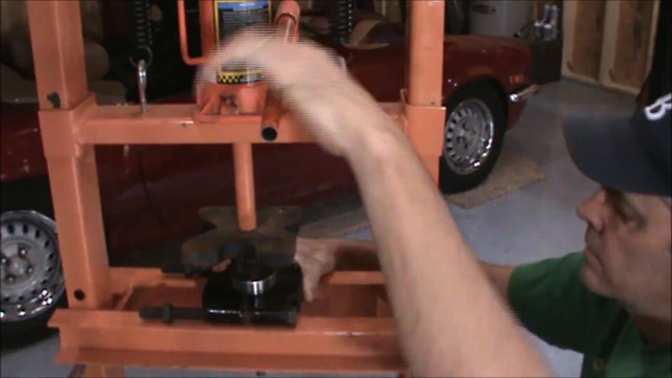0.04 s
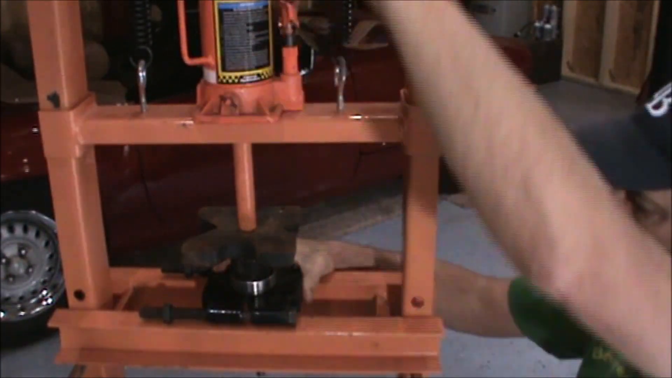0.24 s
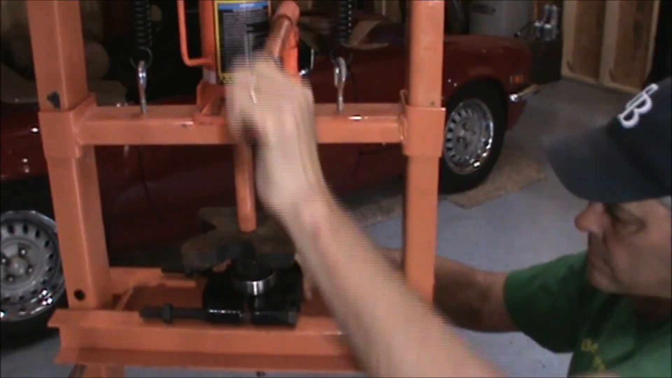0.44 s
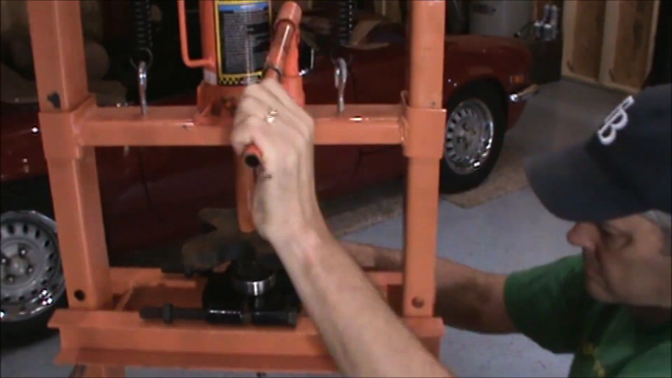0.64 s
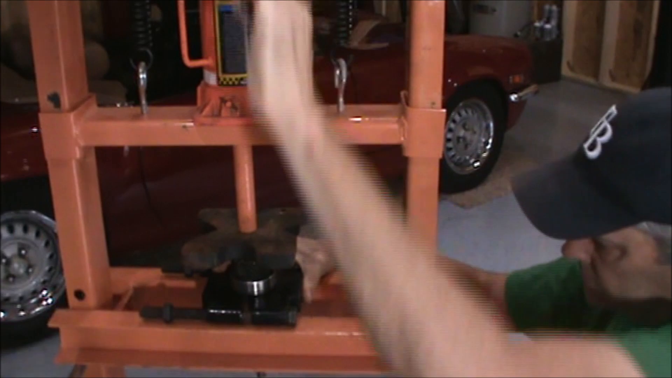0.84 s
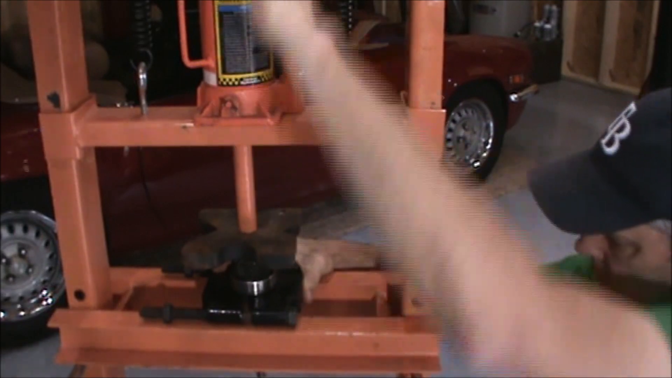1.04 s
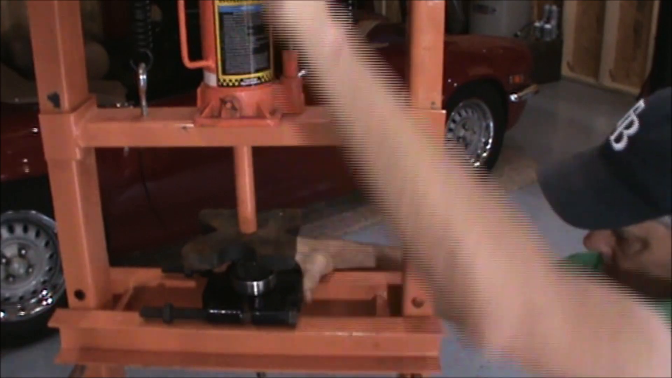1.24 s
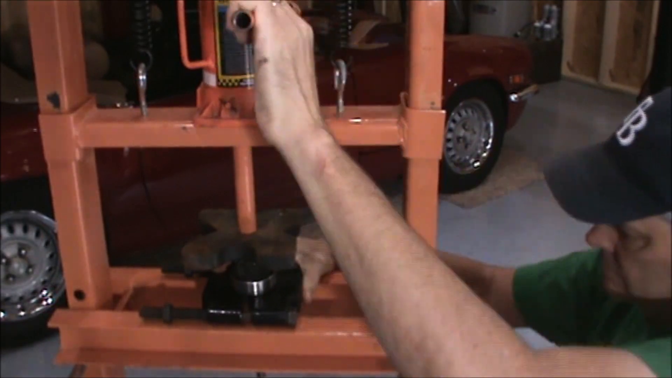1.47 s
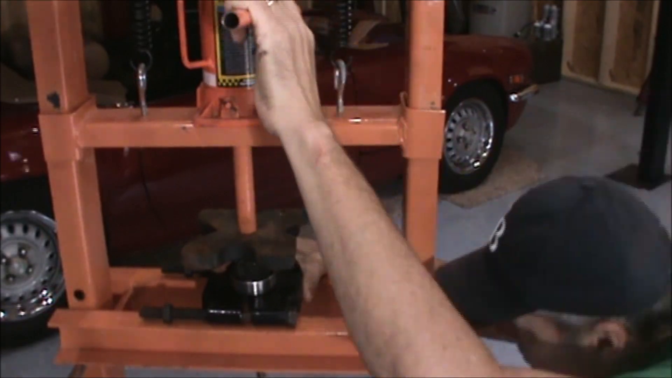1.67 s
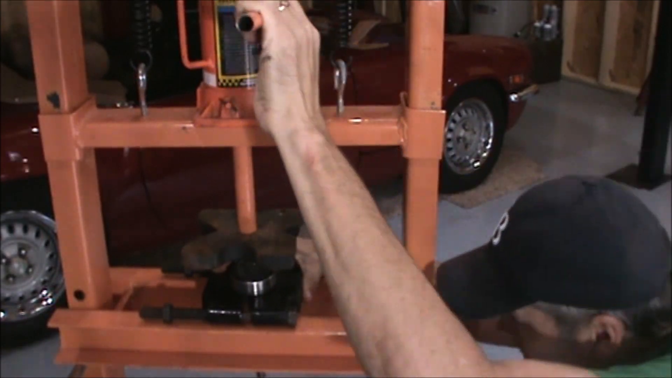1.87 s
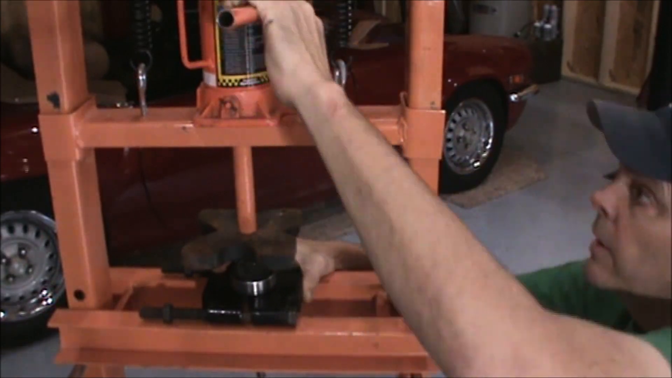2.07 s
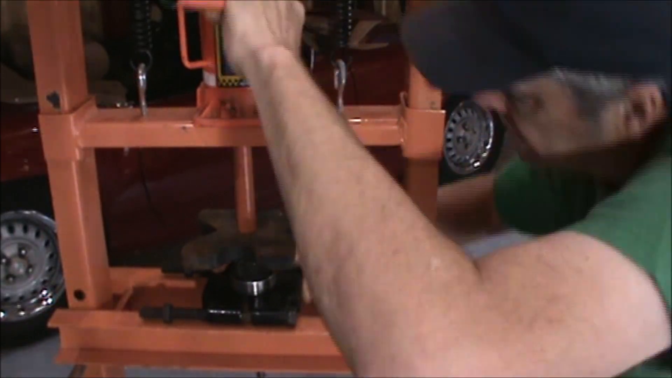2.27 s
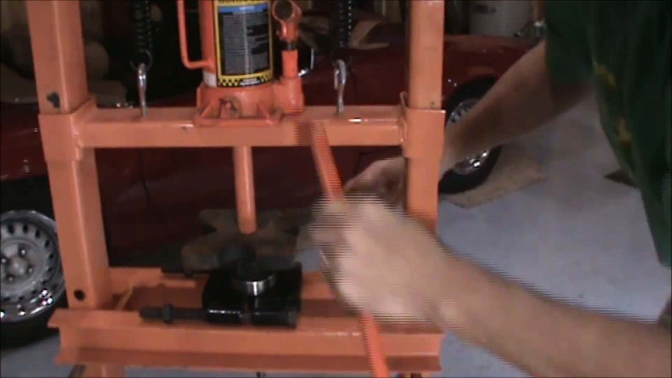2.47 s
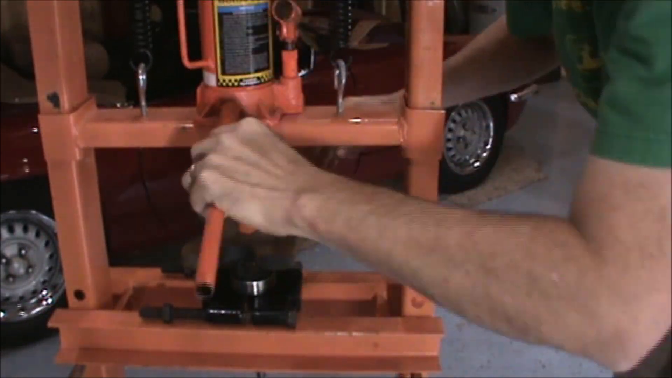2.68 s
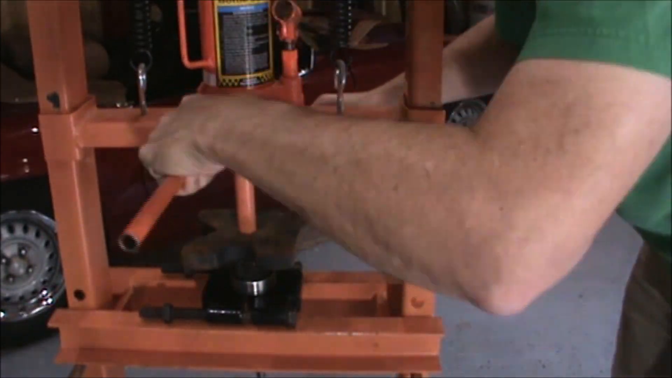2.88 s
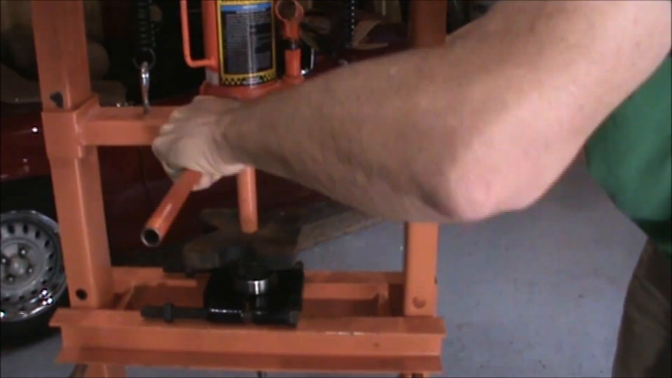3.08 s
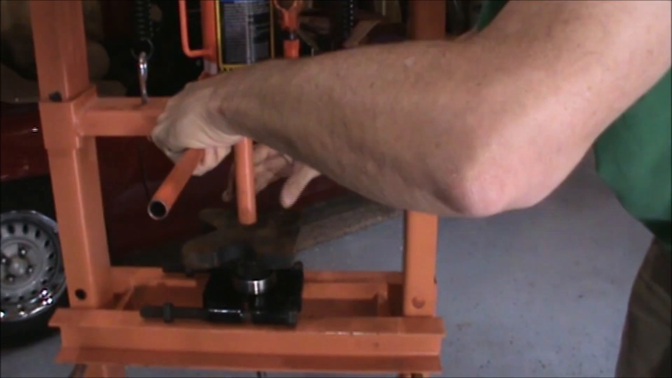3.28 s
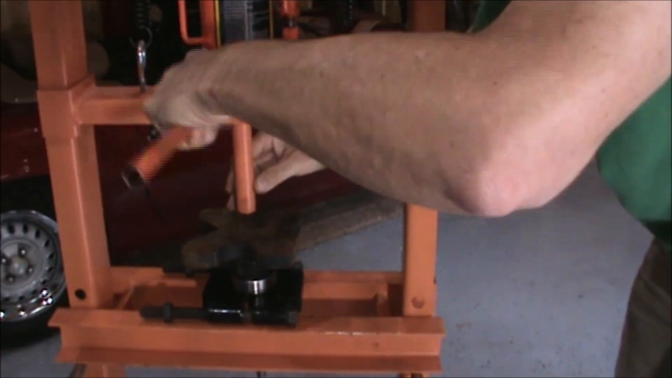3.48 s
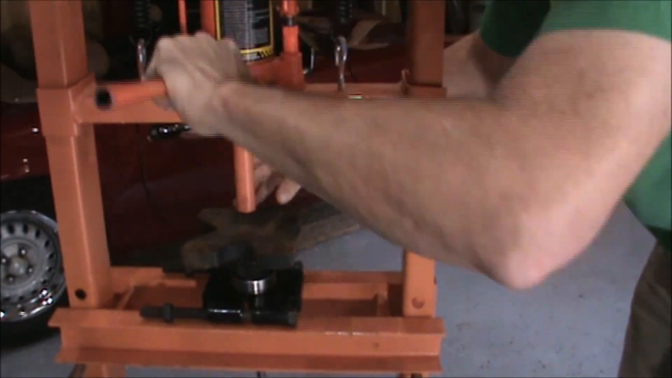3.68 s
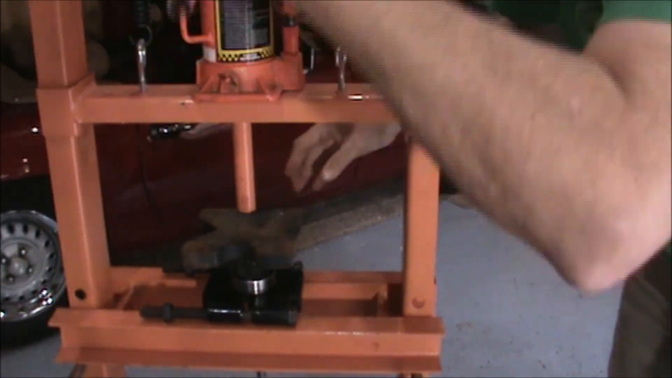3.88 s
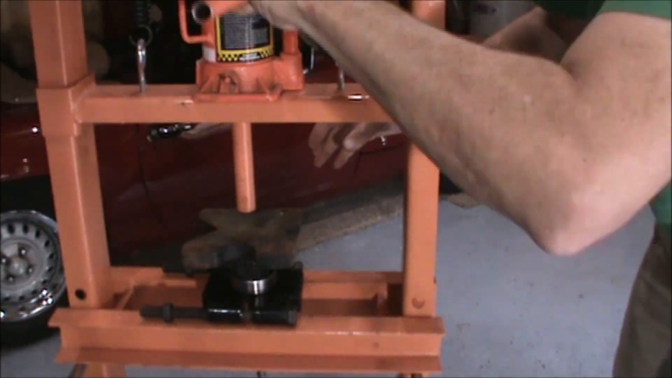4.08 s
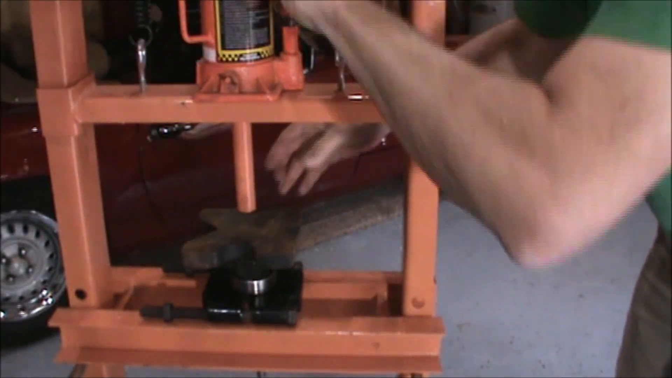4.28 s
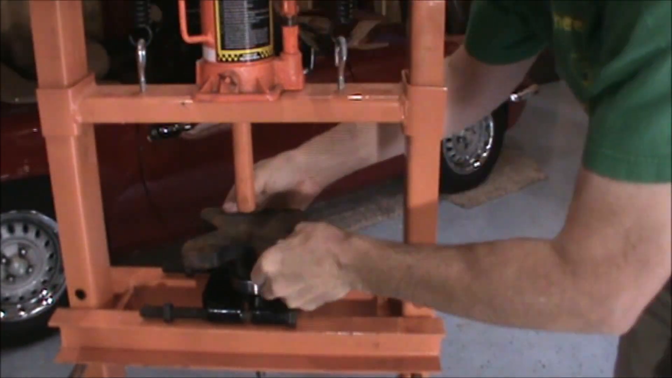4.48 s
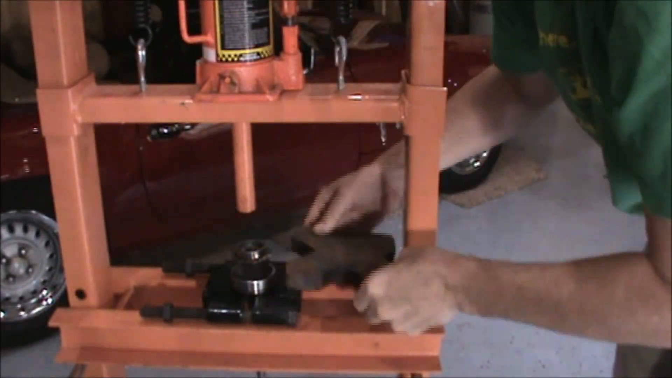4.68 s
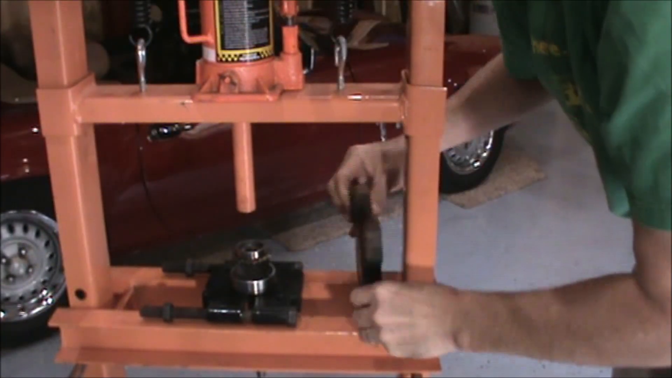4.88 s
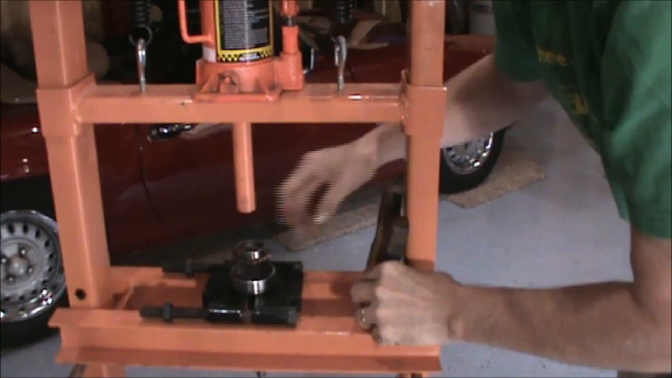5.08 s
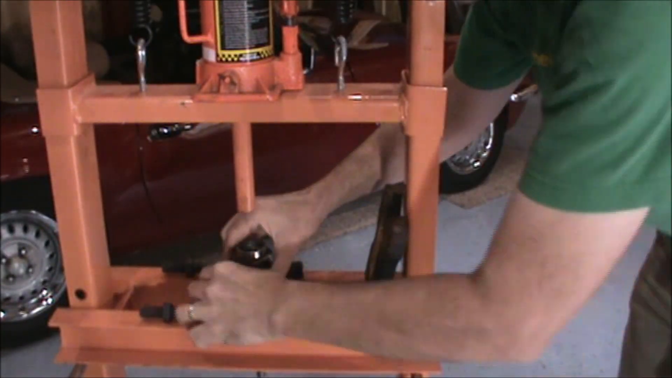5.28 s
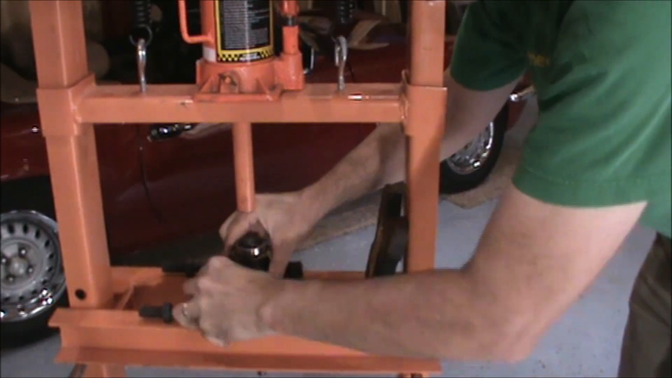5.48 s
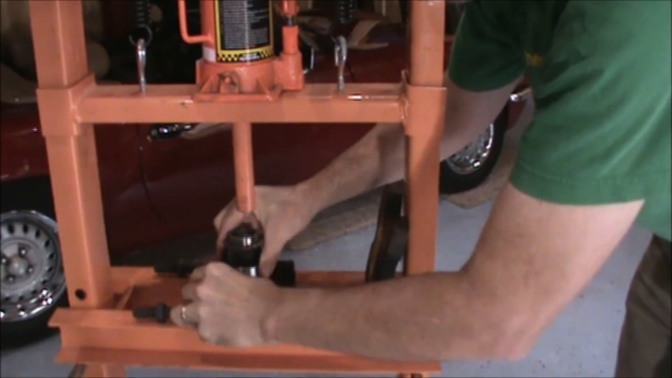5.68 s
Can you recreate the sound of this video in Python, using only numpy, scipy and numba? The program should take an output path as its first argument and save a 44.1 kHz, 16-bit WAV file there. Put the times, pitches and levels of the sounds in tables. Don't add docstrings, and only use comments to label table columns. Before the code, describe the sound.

Close in a small garage with faint hum, a jack lever is pumped five times, each stroke a loud clattering double bang with loose pin rattle. Springs ring on briefly. A pipe handle groans and scrapes free, knocks about, oil hisses faintly, the valve thread squeaks twice, then light ticks and a loud iron clunk as parts are set down.

```python
import sys
import numpy as np
from scipy import signal
from scipy.fft import rfft, irfft
from scipy.io import wavfile
from scipy.ndimage import uniform_filter1d
from numba import njit

SR = 44100
rng = np.random.default_rng(int(sys.argv[2]) if len(sys.argv) > 2 else 0)


def invert_db(level):
    return 10 ** (np.asarray(level, dtype=float) / 20)


def inscribe(sig):
    pcm = np.round(np.clip(np.atleast_2d(sig).T, -1, 1) * 32767)
    wavfile.write(sys.argv[1], SR, pcm.astype(np.int16))


N = 252674
T = np.arange(N) / SR


def noise():
    return rng.standard_normal(N)


def unit(x):
    return x / np.sqrt(np.mean(x ** 2))


def band(x, lo_hz, hi_hz, order=2):
    return signal.sosfilt(signal.butter(order, [lo_hz, hi_hz], "bandpass", fs=SR, output="sos"), x)


def walk(rate_hz):
    k = int(SR / rate_hz)
    return uniform_filter1d(np.repeat(rng.standard_normal(N // k + 1), k), k)[:N]


def curves(table):
    s, *columns = np.transpose(table)
    gate = uniform_filter1d(1. * ((T > s[0]) & (T < s[-1])), size=200)
    return [np.interp(T, s, c) for c in columns] + [gate]


def effort(start_s, level_db, rise_s, hold_s, fall_s):
    times = np.cumsum([start_s, rise_s, hold_s, fall_s])
    levels = level_db - 26.5 * np.array([1, 0, 0, 1])
    return curves(np.transpose([times, levels]))


def heard(level):
    return invert_db(level[0]) * level[1]


def resonances(x, peaks):
    total = 0
    for hz, width_hz, db in peaks:
        total = total + invert_db(db) * signal.lfilter(*signal.iirpeak(hz, hz / width_hz, SR), x) / np.sqrt(width_hz)
    return unit(total)


def squeak(hz, db, gate, overtones, wobble, flutter_db):
    phase = 2 * np.pi * np.cumsum(hz * (1 + wobble * walk(250))) / SR
    tone = 0
    for k, overtone_db in enumerate(overtones):
        tone = tone + invert_db(overtone_db + flutter_db * walk(119.95)) * np.sin((k + 1) * phase)
    return gate * invert_db(db) * tone


@njit
def ring(force, which, gain, pole):
    out = np.zeros(len(force))
    for m in range(pole.shape[1]):
        z = 0j
        for i in range(len(force)):
            z = z * pole[which[i], m] + force[i] * gain[which[i], m] + 1e-18
            out[i] += z.imag
    return out


def knocks(events, modes, ring_db, bare_db, strike_db, grit_db=2.5, clump_db=2.5, scatter_db=3.0,
           treble_hz=7800, tick=0.68, detune=.001):
    events = sorted(events)
    envelope, which, blow = np.zeros((3, N)), np.zeros(N, np.int64), np.zeros(N)
    t = T[:SR // 4]
    linger = np.array([[1.6], [1], [1]])
    for k, (s, db, high_db, low_db, t60_s, held_s) in enumerate(events):
        i = int(s * SR)
        chatter = np.exp(-np.log(1000) * np.maximum(t - held_s, 0) / (t60_s * linger))
        fade = chatter + tick * np.exp(-t / 0.00094)
        new = (invert_db(db + np.array([[low_db], [0], [high_db]])) * fade)[:, :N - i]
        envelope[:, i:i + len(t)] = np.maximum(envelope[:, i:i + len(t)], new)
        blow[i] = invert_db(db + strike_db)
        which[i:] = k
    grit = unit(noise() * invert_db(grit_db * noise() + clump_db * walk(400)))
    grit[blow > 0] = 1.56
    bare = 0
    for e, (lo, hi) in zip(envelope, [(860, 1700), (2350, 8290), (treble_hz, 20200)]):
        bare = bare + band(e * grit, lo, hi, order=3) * np.sqrt(SR / 2 / (hi - lo))
    hz, db, t60_s = np.transpose(modes)
    high_db, low_db = np.array(events)[:, 2:4].T
    db = db + np.outer(np.minimum(low_db + 10, 3), hz < 1900) + np.outer(np.minimum(high_db, 0), hz > 9200)
    shape = (len(events), len(hz))
    gain = invert_db(db + scatter_db * rng.standard_normal(shape)) * (-1.) ** np.arange(len(hz))
    loose_hz = hz * (1 + detune * rng.standard_normal(shape))
    pole = np.exp(2j * np.pi * loose_hz / SR - np.log(1000) / (t60_s * SR))
    return invert_db(bare_db) * bare + ring(invert_db(ring_db) * bare + blow, which, gain, pole)


# chatter_t60_s, chatter_held_s
CHATTER_OF_KIND = dict(pump=(0.13, 0.006), link=(0.095, 0.0014), spring=(.07, 0.03), handle=(0.085, 0.0036),
                   tick=(0.023, 0.00099), glint=(0.046, 0.0022), shim=(0.078, 0.0055), part=(0.094, 0.0033),
                   bearing=(0.036, 0.0028))


def kind(rows, name, *shared_db):
    return [(*row, *shared_db, *CHATTER_OF_KIND[name]) for row in rows]


# pitch_hz, level_db (against the air)
LAMP_LINES = [(479, -3.5), (963, -8.5), (1349, -7.5), (1662, -13), (4930, -11), (4330, -9.5)]


def lamp_hum():
    hum = 0
    for hz, db in LAMP_LINES:
        hum = hum + invert_db(db + 3.5 + walk(14)) * np.sin(2 * np.pi * hz * T + .5 * walk(8.9))
    return hum


# pitch_hz, level_db (per Hz)
HUSH_COLOUR = [(15, -62), (25, -53), (142, -16.5), (330, -5.5), (368, -6.5), (483, -2.5), (584, -6.5),
               (952, -4.5), (1780, -11.5), (4240, -14.5), (4730, -14), (5130, -16.5), (5720, -18),
               (15200, -25.5), (16500, -51)]


def air(level_db):
    hz, colour_db = np.transpose(HUSH_COLOUR)
    f = np.fft.rfftfreq(N, 1 / SR)
    shape = invert_db(np.interp(np.log(f + 1), np.log(hz), colour_db))
    mid, side = (irfft(rfft(noise()) * shape, N) for _ in range(2))
    side = invert_db(-19) * side + invert_db(-6.0) * band(side, 1230, 21000)
    both = np.array([mid + side, mid - side]) / np.std(band(mid, 150, 785))
    treble = np.array([band(c, 1140, 22000) for c in both])
    treble_gain = invert_db(3.5 + 0.91 * walk(5.8)) - 1
    return invert_db(level_db - 3.5 + 1.06 * walk(5.19)) * (both + treble_gain * treble + lamp_hum())


def ducked(metal):
    start_db, lowest_db, loudest_db, slope, climb_db_per_s = -54, -56, -22.5, 4.4, 3.5
    loud_db = 10 * np.log10(uniform_filter1d(metal[0] ** 2, size=1300) + 1e-9)
    ceiling = lowest_db + slope * np.maximum(loudest_db - loud_db, 0)
    ceiling[0] = start_db
    climb = climb_db_per_s * T
    return uniform_filter1d(climb + np.minimum.accumulate(ceiling - climb), size=900)


def garage(x):
    t60_s, tail_db = 0.17, -9
    t = T[:SR // 2]
    fade = np.exp(-np.log(1000) * t / t60_s) * (1 - np.exp(-t / 0.0032))
    tail = signal.lfilter([1], [1, -.35], rng.standard_normal((3, len(t))) * fade)
    tail = np.array([0.7 * tail[0] + tail[1], 0.72 * tail[0] + tail[2]])
    tail *= invert_db(tail_db) / np.sqrt(np.sum(tail ** 2) / 2)
    return x * invert_db(np.array([[.4], [-.4]])) + signal.fftconvolve(x[None], tail)[:, :N]


# start_s, peak_db, treble_db, lows_db (both against the peak)
BEARING_KNOCKS = [
    (3.158, -21, -1.5, -19),
    (4.5535, -27, -12, -15),
    (5.4015, -35, -5, -19),
    (5.4055, -26, -5, -19),
    (5.409, -15.5, -4, -21),
    (5.412, -21, -6, -24.5),
    (5.633, -47, -14, -38),
    (5.65, -40.5, -14, -38),
    (5.698, -47, -14, -38),
]
# pitch_hz, level_db, t60_s
RACE_MODES = [(1316, -8, 0.033), (4610, -13, 0.025), (4200, -17, 0.032), (5846, -17, .04),
              (4818, -20, 0.18), (6780, -11, 0.02), (8650, 3, 0.025), (8580, -10, 0.07), (9948, -22, 0.05),
              (11530, -26, 0.09)]


def bearing():
    return knocks(kind(BEARING_KNOCKS, "bearing"), RACE_MODES, ring_db=-57.0, bare_db=-14.5, strike_db=-1.0,
                  scatter_db=-0.1, tick=.3)


# start_s, peak_db, treble_db, lows_db (both against the peak)
SHIM_KNOCKS = [
    (4.785, -17.5, -19, -10.5),
    (4.9801, -32, -9, 5),
    (5.522, -32, -16, -13),
]
# pitch_hz, level_db, t60_s
SHIM_MODES = [(1332, -12, 0.058), (2030, 3, .035), (2336, -4, 0.037), (2750, -1, 0.035), (3230, -2, 0.14),
              (4040, -11, .04), (4430, 0.5, 0.035), (4900, -10, .06), (5640, -4, 0.04), (6360, -15, .03),
              (7350, -15, .03)]


def shims():
    return knocks(kind(SHIM_KNOCKS, "shim"), SHIM_MODES, ring_db=-50.0, bare_db=-15.0, strike_db=-15.0,
                  scatter_db=4.5)


# start_s, peak_db, treble_db, lows_db (both against the peak)
PART_KNOCKS = [
    (5.0335, -5, -6, -19),
]
# pitch_hz, level_db, t60_s
IRON_MODES = [(1340, -11, 0.046), (2060, -3, 0.03), (2340, -20, 0.12), (3120, -4, 0.057), (3270, 1.5, 0.11),
              (3355, -2.5, 0.13), (3480, -5, 0.067), (3994, -12, 0.16), (4600, -9, 0.15),
              (4830, -3.5, 0.33), (5180, -4, 0.05), (5534, -4, .09), (5857, -16, 0.37), (6700, -26, .25),
              (8484, -18, .1), (10400, -16, .06)]


def parts():
    return knocks(kind(PART_KNOCKS, "part"), IRON_MODES, ring_db=-54.5, bare_db=-14.5, strike_db=-18.0,
                  scatter_db=0.8, tick=.3)


# pitch_hz, width_hz, level_db
OIL_PEAKS = [(10300, 250, -2), (10480, 200, -3), (10900, 150, -1), (11700, 200, 3), (12900, 250, 3),
             (13700, 200, 3)]


def oil():
    jets = invert_db(5 * walk(18)) * resonances(noise(), OIL_PEAKS) + 0.44 * unit(band(noise(), 4200, 20000))
    hiss = invert_db(3.7 * walk(34)) * jets
    whistle = resonances(noise(), [(6630, 300, 0)])
    return (heard(effort(3.16, -52.5, .01, .31, .02)) * hiss
            + heard(effort(3.36, -46, .09, .035, .012)) * whistle)


# time_s, level_db
RUB_LEVEL = [(3.488, -54.5), (3.497, -38), (3.52, -38.5), (3.565, -47), (3.574, -30), (3.59, -31.5),
             (3.605, -46), (3.63, -68)]
# pitch_hz, width_hz, level_db
RUB_PEAKS = [(2730, 140, 9), (3270, 270, 8), (3850, 720, 12.5), (5470, 400, 4), (7400, 1000, 7),
             (10000, 1000, 0), (14500, 2500, -24)]
# pitch_hz, width_hz, level_db
BODY_PEAKS = [(4160, 210, 0), (5050, 300, 1), (5600, 350, -6)]


def thread_rub():
    rub = heard(curves(RUB_LEVEL)) * invert_db(3.5 * walk(250)) * resonances(noise(), RUB_PEAKS)
    body = invert_db(3. * walk(90)) * resonances(noise(), BODY_PEAKS)
    return rub + heard(effort(3.6, -46, .02, .06, .16)) * body


# time_s, level_db
FIRST_SQUEAK = [(3.488, -46), (3.495, -19), (3.506, -19), (3.511, -27), (3.519, -21), (3.527, -29),
                (3.536, -48), (3.548, -35), (3.558, -52)]
# time_s, pitch_hz, level_db
SECOND_SQUEAK = [(3.505, 3630, -50), (3.511, 3630, -23), (3.53, 3640, -22), (3.559, 3690, -24),
                 (3.566, 3800, -23), (3.572, 3760, -34), (3.588, 3700, -50)]
FIRST_OVERTONES = [-0.5, -8.5, -20, -19, -23, -22]
SECOND_OVERTONES = [0.5, -6, -7.5, -6]


def valve_squeaks():
    first_hz = 2390
    first = squeak(first_hz, *curves(FIRST_SQUEAK), FIRST_OVERTONES, 0.009, 1.8)
    octave = squeak(first_hz, *effort(3.5, -31, .008, .022, .07), [-30., 0], 0.0054, 2.5)
    sum_tone = squeak(8440, *effort(3.508, -42, .004, .015, .02), [0], .003, 3.3)
    second = squeak(*curves(SECOND_SQUEAK), SECOND_OVERTONES, 0.005, 2.0)
    return first + octave + sum_tone + second


# time_s, pitch_hz, level_db
GROAN_GLIDE = [(2.132, 730, -66), (2.138, 716.5, -36), (2.15, 750, -30), (2.161, 885, -33),
               (2.174, 936, -31), (2.182, 970, -44), (2.195, 905, -54)]
GROAN_OVERTONES = [-0.5, -18, -1.5, -24]
# pitch_hz, width_hz, level_db
FREEING_PEAKS = [(1780, 420, -3), (2240, 88, -3), (2520, 200, 9.5), (2740, 150, -30), (5900, 500, -3.5),
                 (10100, 600, -25)]
SLIDING_PEAKS = [(2370, 170, -10), (3140, 330, 2.5), (4020, 95, -9), (7240, 1600, -2.5), (10520, 220, -1),
                 (13600, 1500, -11)]


def drag():
    grains = noise() * invert_db(3.0 * walk(500) + 1.8 * walk(60))
    low = resonances(grains, FREEING_PEAKS) + 0.089 * unit(band(grains, 650, 19000))
    high = resonances(grains, SLIDING_PEAKS) + 0.11 * unit(band(grains, 2700, 15000))
    brush = unit(band(grains, 3500, 16000))
    scrape = heard(effort(2.126, -27, .024, .03, .035)) * low
    scrape += heard(effort(2.12, -35, .1, .045, .09)) * high
    scrape += heard(effort(2.468, -41, .015, .02, .05)) * brush
    return scrape + squeak(*curves(GROAN_GLIDE), GROAN_OVERTONES, 0.018, 2.3)


# start_s, peak_db, treble_db (against the peak)
RIM_GLINTS = [(2.2654, -30, 17), (2.295, -26, 14), (2.303, -39, 17.5), (2.5854, -49, 16), (2.6, -50, 14),
              (2.6173, -50, 14), (2.6486, -46, 21), (3.0876, -38, 14), (3.094, -27, 16), (4.2155, -42, 20),
              (4.2263, -29, 13), (4.2335, -31, 15), (4.2415, -28.5, 12), (4.304, -41, 16)]
# pitch_hz, level_db, t60_s
RIM_MODES = [(7200, -14, .05), (10600, -12, .02), (12800, -2, .02), (13700, -3, .025), (14800, 0, .02)]


def glints():
    return knocks(kind(RIM_GLINTS, "glint", -14), RIM_MODES, ring_db=-52., bare_db=-13.5, strike_db=-18.,
                  treble_hz=11300, tick=2.2)


# start_s, peak_db, treble_db, lows_db (both against the peak)
HANDLE_KNOCKS = [(2.1251, -34, -7, 1), (2.356, -29.5, 5, -23), (2.5326, -21, 8, -12.5),
                 (2.5385, -21, -14, -25), (2.7427, -16, 4.5, -23), (2.7525, -19.5, -25, -33),
                 (2.8713, -18.5, -1, -25), (2.8833, -14, -3, -31), (2.9682, -24, 7.5, -26),
                 (3.031, -22.5, 11, -27), (3.052, -24, -11, -17), (3.0876, -37, -4, 7.5),
                 (3.2375, -40, -7, 2), (3.381, -35.5, -2, -7), (3.6061, -17.5, -3.5, -27),
                 (3.8011, -22, 1.5, -18.5), (3.823, -27.5, -27, -24), (4.133, -25, 6, -11),
                 (4.2426, -27, 1, -23), (4.2954, -40, 9, -22), (4.3126, -27, 3, -31),
                 (4.3297, -27.5, 0.5, -12)]
# start_s, peak_db, treble_db (against the peak)
PIPE_TICKS = [
    (2.1787, -42, -20),
    (2.9282, -31, 5),
    (3.6726, -43, 7),
    (3.6894, -43, 5),
    (4.152, -28, 8),
    (4.173, -28, 9.5),
    (4.1961, -26, 10),
    (3.779, -36.5, -20),
    (3.79, -44, -20),
]
# pitch_hz, level_db, t60_s
PIPE_MODES = [(2540, -22, 0.1), (3276, -15, 0.12), (4115, -14, 0.19), (4440, -9, 0.073), (5120, -10, 0.06),
              (5527, -11, 0.08), (6170, -7.5, 0.11), (7060, -15, 0.11), (7166, 3, 0.022),
              (9000, -20, 0.072), (11150, -18, .03), (12500, -6, .025)]


def handle():
    touches = kind(HANDLE_KNOCKS, "handle") + kind(PIPE_TICKS, "tick", -14)
    return knocks(touches, PIPE_MODES, ring_db=-45.0, bare_db=-14.0, strike_db=-19.5, scatter_db=3.0,
                  tick=2.0, detune=.015)


# start_s, peak_db
SPRING_JOLTS = [
    (.401, -39),
    (.633, -40),
    (.901, -41.5),
    (1.155, -37.5),
    (1.412, -29),
]
# pitch_hz, level_db, t60_s
SPRING_MODES = [(5168, -18, 1.3), (6056, -13, 1.6), (4317, -14, .9), (5340, -1, 0.41), (6080, -9, 1.7),
                (3871, -25, 1), (4538, -9, 1), (4750, -14, .85), (4020, -14, 0.66), (4880, -15.5, 2.7),
                (4950, -17, 0.4), (5150, -8, .3), (5130, -9, 0.92), (5380, -11, 2.3), (5502, -2.5, 0.86),
                (5636, -9, 1.2), (5900, -11, 1.9), (5800, -3, 0.91), (5873, -1.5, 1.4), (5916, -2.5, 1.3),
                (5900, 7, 0.34), (6148, -5, .5), (5950, -7, 0.51), (6160, -15, .4), (6540, -15.5, 1.1),
                (6700, -11, .3)]
# time_s, level_db
LATE_SWELL = [(1.43, -62), (1.52, -53), (1.63, -44), (1.75, -47), (1.9, -56), (2.13, -62)]


def springs():
    chance = rng.standard_normal((45, 3))
    crowd = [5750 + 420 * chance[:, 0], -15 + 3 * chance[:, 1], 0.6 * invert_db(2.3 * chance[:, 2])]  # Hz, dB, t60 s
    modes = np.vstack([SPRING_MODES, np.transpose(crowd)])
    high_db, low_db = -26, -21
    ringing = knocks(kind(SPRING_JOLTS, "spring", high_db, low_db), modes, ring_db=-51.0, bare_db=-68.0,
                     strike_db=-2.5, scatter_db=.8, detune=.0001)
    ringing += heard(curves(LATE_SWELL)) * np.sin(2 * np.pi * 2595 * T)
    return ringing * np.exp(-np.maximum(T - 2.13, 0) / .03)


# pitch_hz, level_db, t60_s
FRAME_MODES = [(3400, -18, .5), (3874, -3.5, 0.89), (3957, 3, 0.32), (4060, -8, .6), (4350, -2, 0.37),
               (4455, 1, 0.31), (4545, -10.5, 1.4), (4930, -9, 0.4), (5510, -4, 0.32), (5900, -11, 0.31)]


def frame(blows):
    heavy = [(s, db + low_db, high_db, -10, *rest) for s, db, high_db, low_db, *rest in blows]
    return knocks(heavy, FRAME_MODES, ring_db=-50.5, bare_db=-68., strike_db=-29.5, scatter_db=0.6, detune=.0025)


# start_s, peak_db, treble_db (against the peak)
LINK_KNOCKS = [(.187, -22.5, 8), (.2445, -39, 10), (.2484, -30.5, 11), (.2588, -25.5, 10), (.263, -22.5, 8),
               (.3211, -30.5, 8), (.3482, -35, 4.5), (.352, -31, 2), (.3575, -16, 0.5), (.512, -29.5, 7),
               (.521, -28, 8.5), (.5661, -29.5, 7), (.606, -29, -2), (.609, -15.5, -3), (.612, -10.5, -4.5),
               (.7593, -25.5, 3.5), (.805, -36.5, 0), (.8324, -31, 4), (.852, -20.5, 10.5),
               (.857, -12.5, -2), (1.002, -25, 4.5), (1.0777, -33, 2), (1.104, -25.5, -2),
               (1.1106, -15, 4.5), (1.2665, -32, 6), (1.2744, -27.5, 11), (1.3316, -33, 2),
               (1.3484, -36, 0), (1.359, -27, 4), (1.3646, -26.5, 14.5), (1.3693, -17.5, 5.5)]
# pitch_hz, level_db, t60_s
PIN_MODES = [(1253, -10.5, 0.057), (2430, -15, 0.061), (3910, -1.5, 0.045), (4043, 2.5, 0.031),
             (5420, 3, 0.05), (5920, -2, 0.041), (6190, -5, 0.034), (7120, -2, 0.031), (9000, -23, 0.027),
             (10600, -6, 0.045), (11400, -5, .04), (12800, -2, .025), (14100, -7, .04)]


def links(slack):
    return knocks(slack, PIN_MODES, ring_db=-42.5, bare_db=-12.5, strike_db=-13.0, scatter_db=1.8, detune=.008)


# start_s, peak_db, treble_db, lows_db (both against the peak)
PUMP_KNOCKS = [(.4, -11, -2.5, -10.5), (.4194, -13, -2.5, -13.5), (.4395, -12, -0.5, -15),
               (.456, -20, -2, -18), (.6326, -12, -3, -11.5), (.647, -17, 3, -11), (.6662, -12, 1, -12.5),
               (.6727, -13, 0.5, -17), (.6926, -12.5, 2, -15), (.703, -14, 1, -13.5),
               (.9004, -10.5, -0.5, -12), (.9294, -12.5, 0, -13.5), (.9496, -17.5, -1, -12.5),
               (1.1546, -13, 3, -14.5), (1.1665, -13, -1, -13.5), (1.1879, -14.5, 3, -11.5),
               (1.207, -17, 1, -14), (1.4116, -9.5, -0.5, -26), (1.4251, -11, -7, -25),
               (1.443, -19, -3, -24)]
# pitch_hz, level_db, t60_s
JACK_MODES = [(949, -23, 0.42), (1193, -20, 0.3), (1253, -3.5, 0.08), (1308, -6, 0.088), (1390, -5.5, 0.1),
              (1502, -6, 0.14), (2310, -10.5, 0.21), (2396, -2.5, 0.068), (4004, -1, 0.048),
              (4910, -6.5, 0.15), (5210, -6, 0.11), (6530, -2.5, 0.059), (7840, -4.5, 0.085),
              (8350, -10, 0.096), (9005, 6, 0.046), (9770, -1.5, 0.13), (11300, -17, .05)]


def pump(strokes):
    return knocks(strokes, JACK_MODES, ring_db=-46.5, bare_db=-11.5, strike_db=-16.0, scatter_db=2.2,
                  tick=1.3, detune=.008)


def scene():
    strokes, slack = kind(PUMP_KNOCKS, "pump"), kind(LINK_KNOCKS, "link", -17.5)
    press = pump(strokes) + frame(strokes + slack) + links(slack) + springs()
    pipe = handle() + glints() + drag()
    valve = oil() + thread_rub() + valve_squeaks()
    metal = garage(press + pipe + valve + parts() + shims() + bearing())
    return metal + air(ducked(metal))


def low_pass(x):
    return signal.sosfilt(signal.butter(12, 16970, fs=SR, output="sos"), x)


def record(dry):
    limit = .6
    soft = limit * np.tanh(dry / limit)
    soft = signal.sosfilt(signal.ellip(8, .2, 40, 15900, fs=SR, output="sos"), soft)
    return low_pass(soft)


dry = scene()
out = record(dry)
inscribe(out)
```